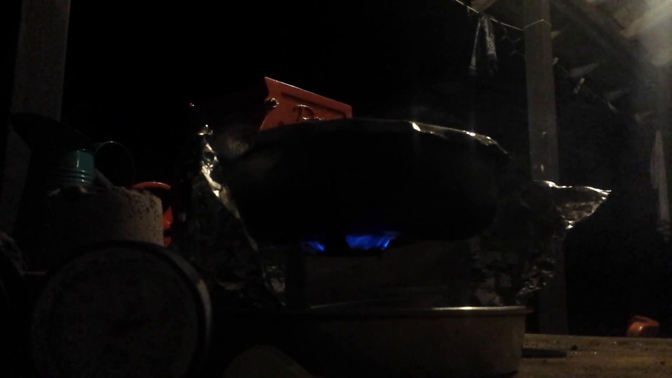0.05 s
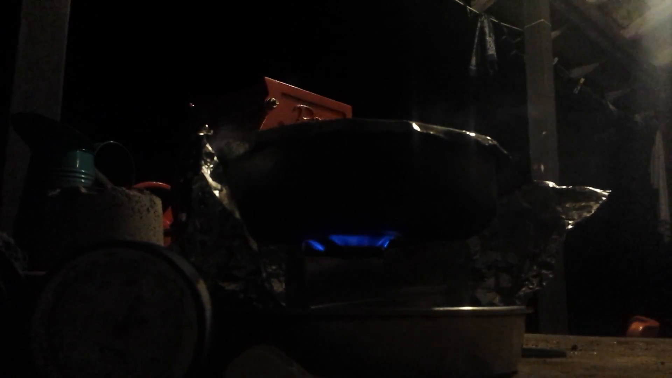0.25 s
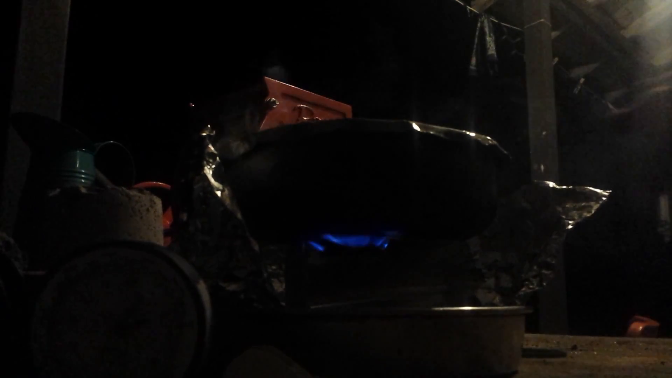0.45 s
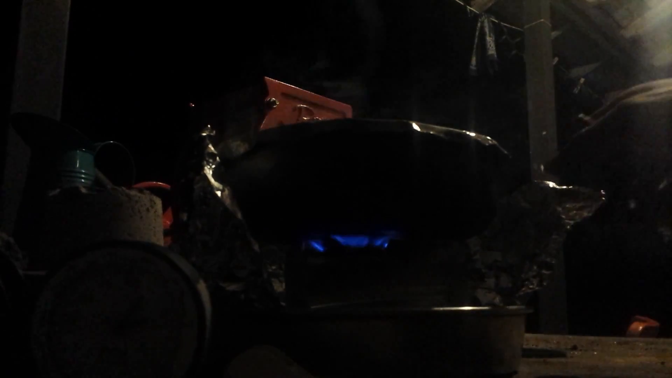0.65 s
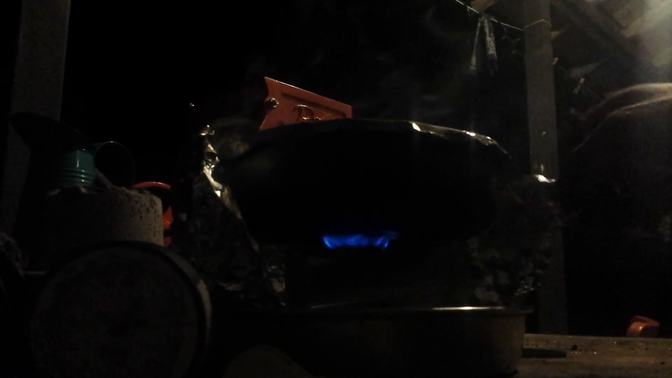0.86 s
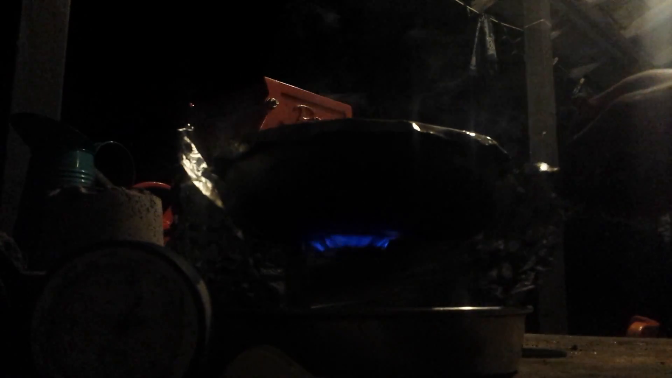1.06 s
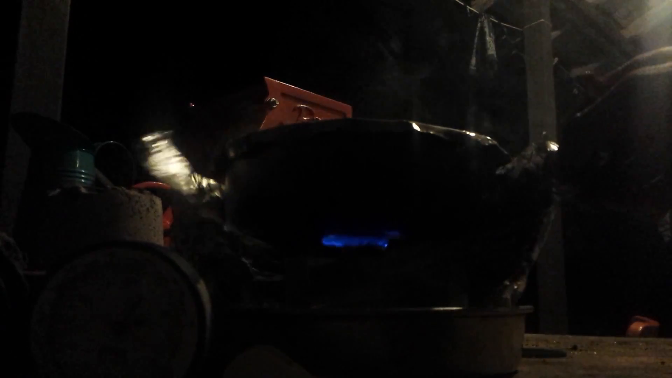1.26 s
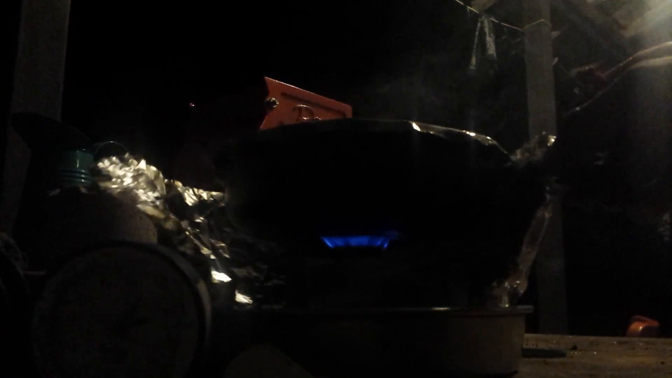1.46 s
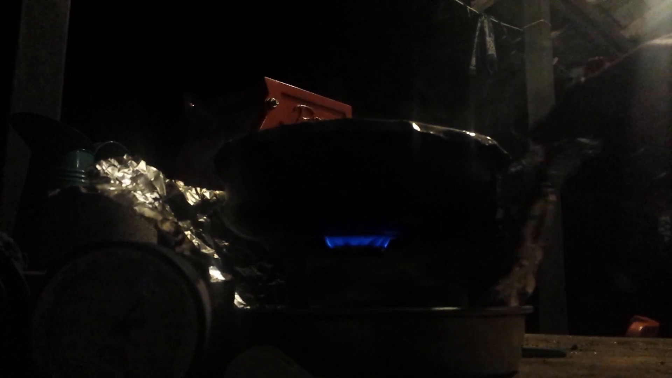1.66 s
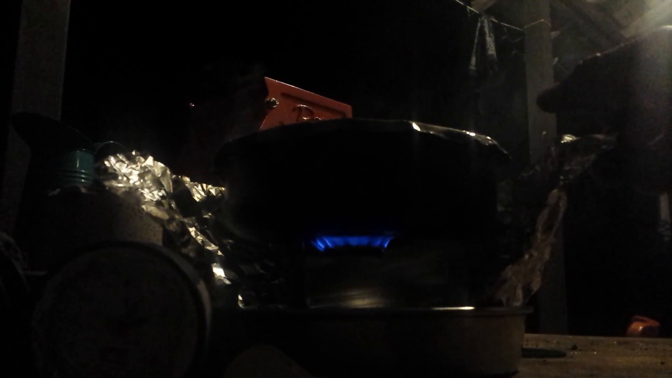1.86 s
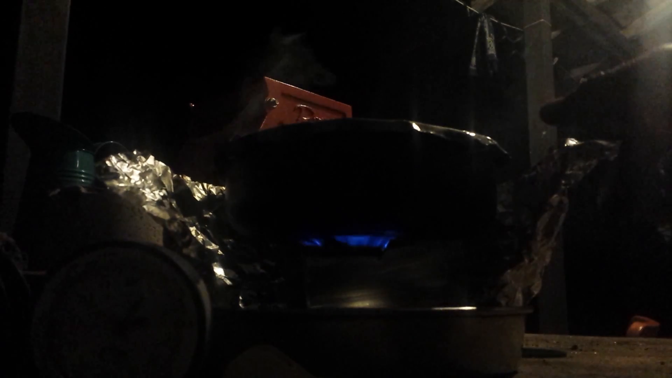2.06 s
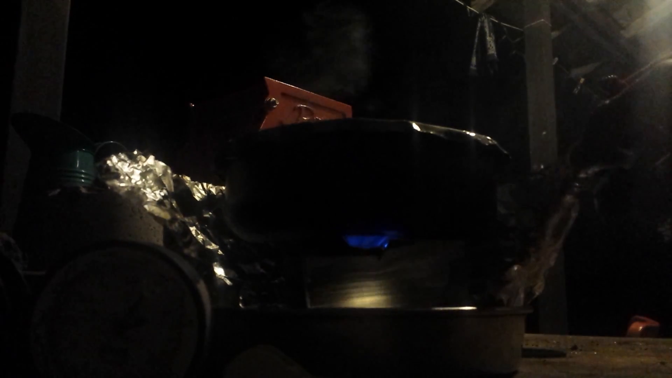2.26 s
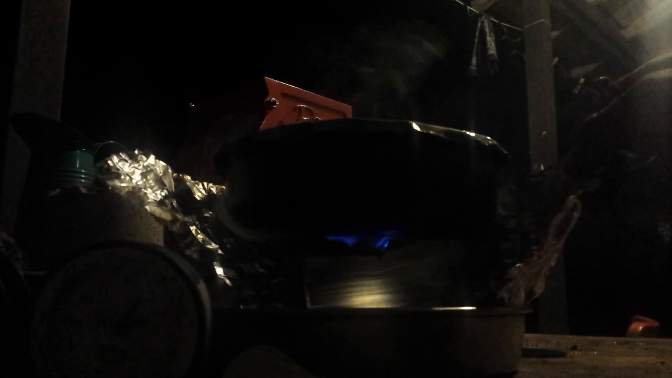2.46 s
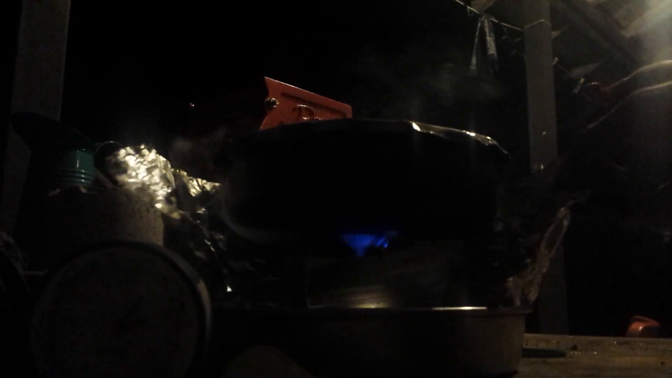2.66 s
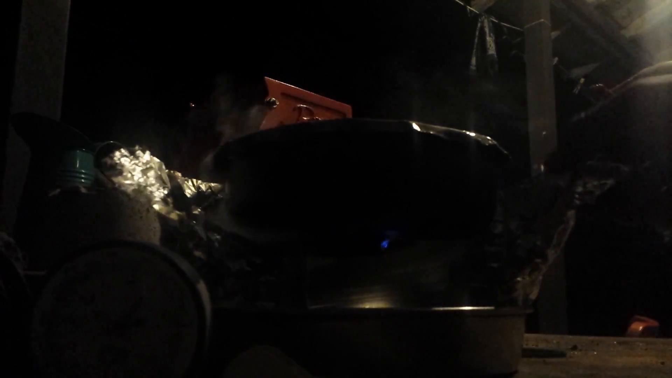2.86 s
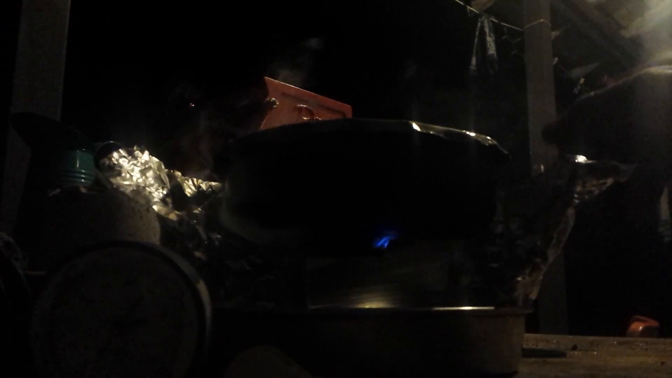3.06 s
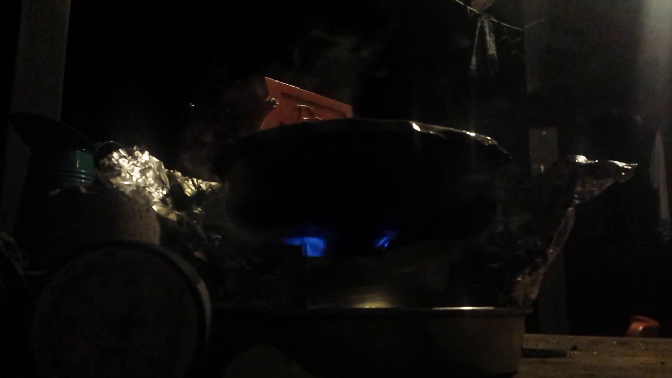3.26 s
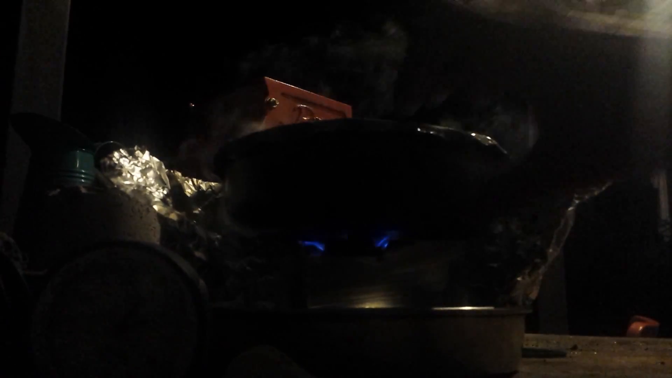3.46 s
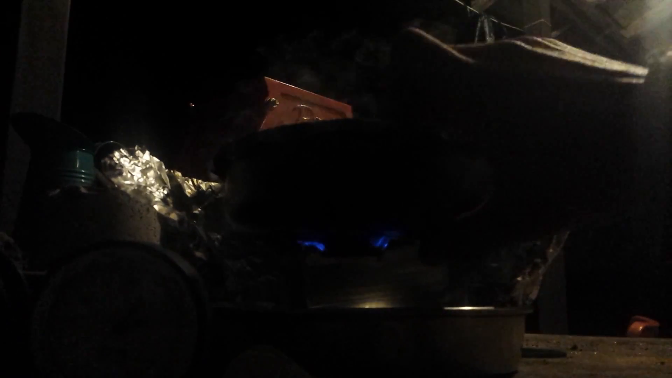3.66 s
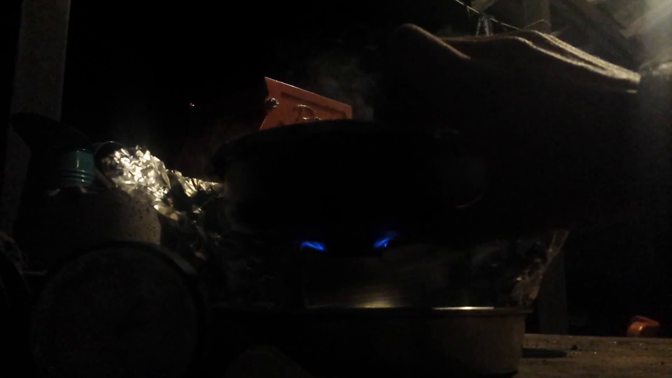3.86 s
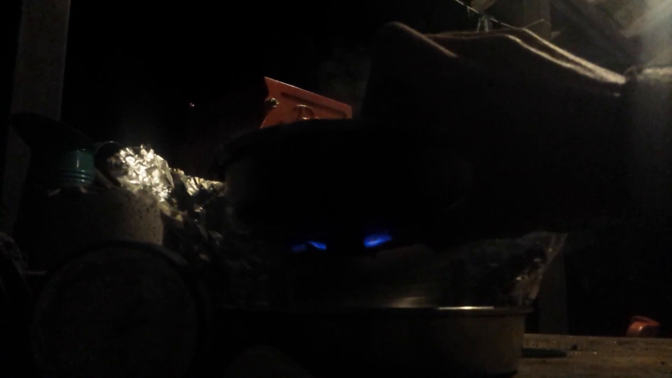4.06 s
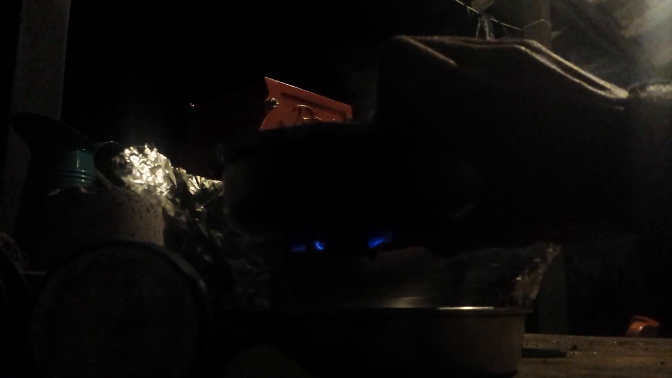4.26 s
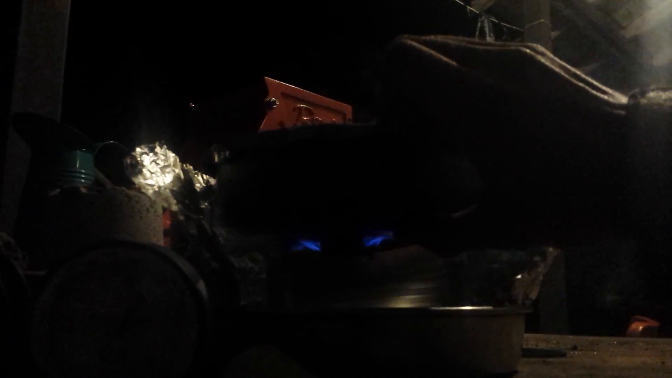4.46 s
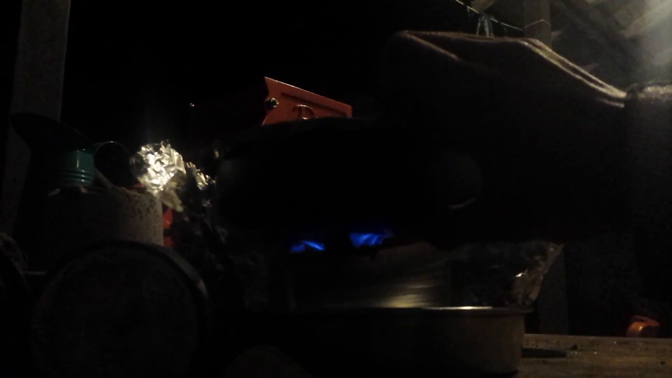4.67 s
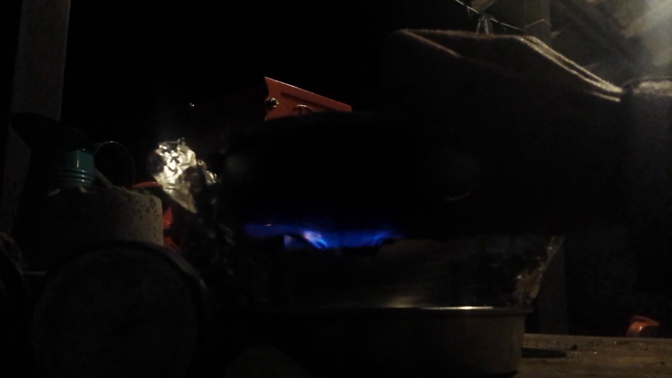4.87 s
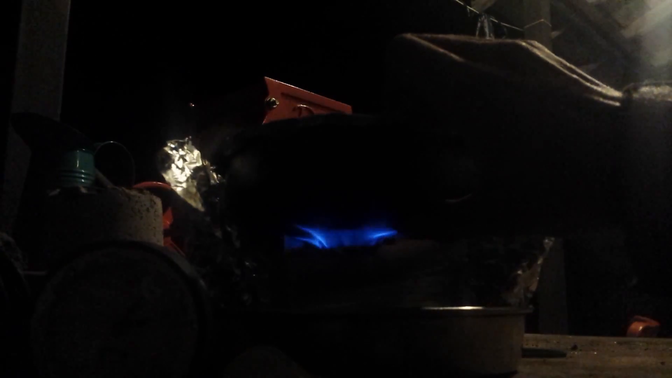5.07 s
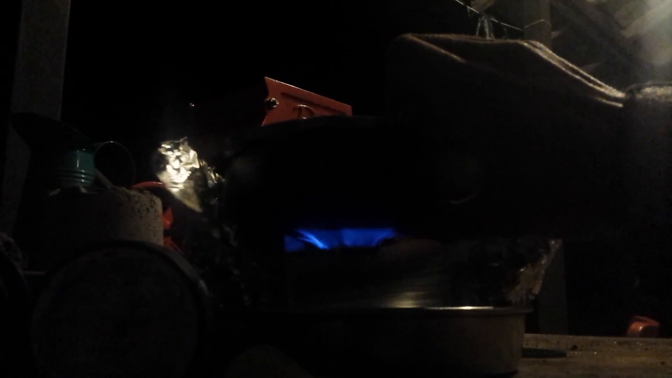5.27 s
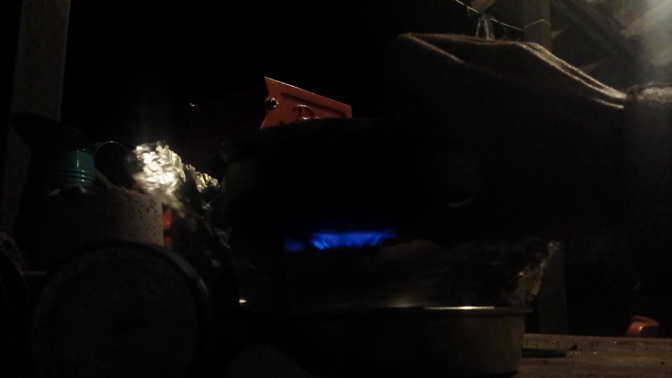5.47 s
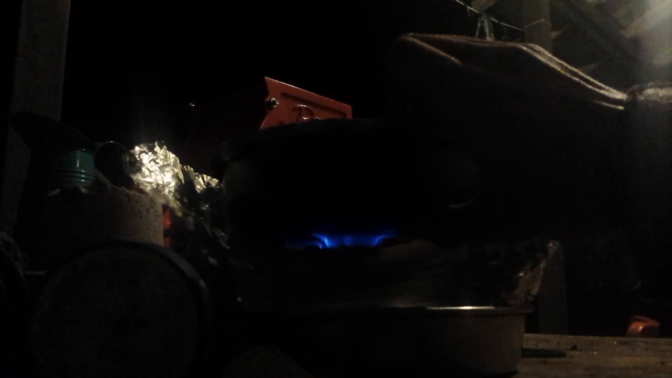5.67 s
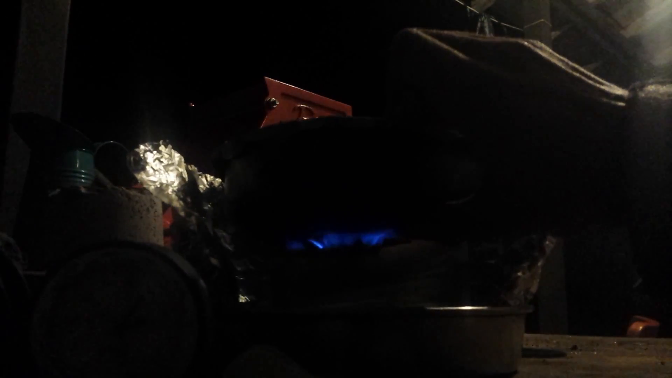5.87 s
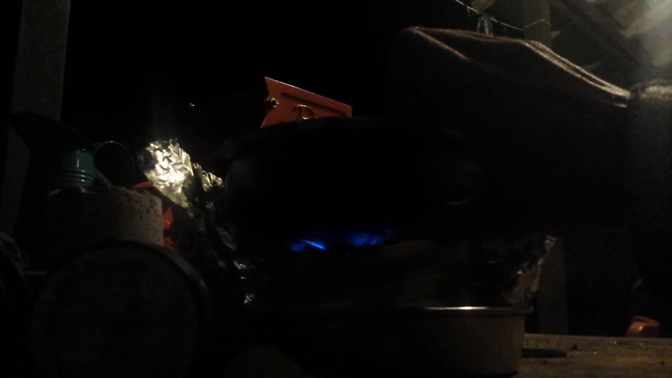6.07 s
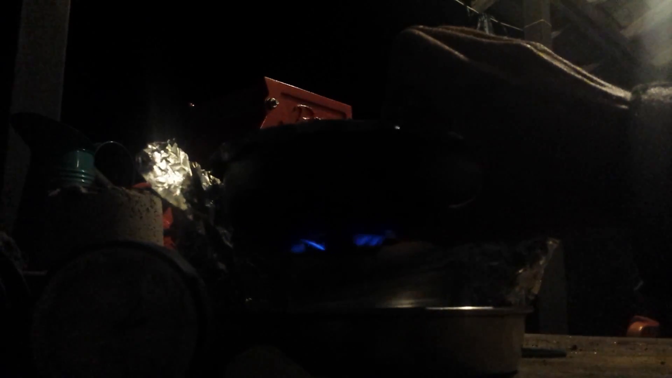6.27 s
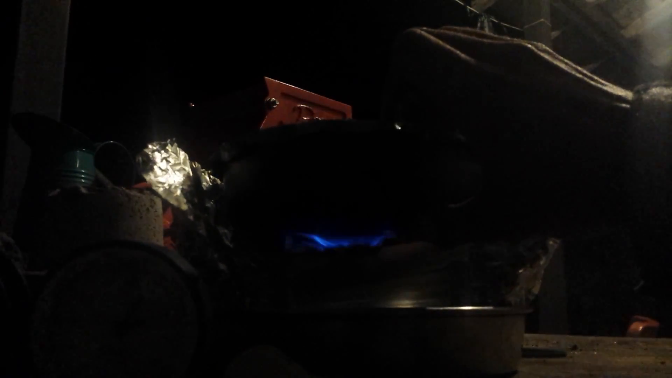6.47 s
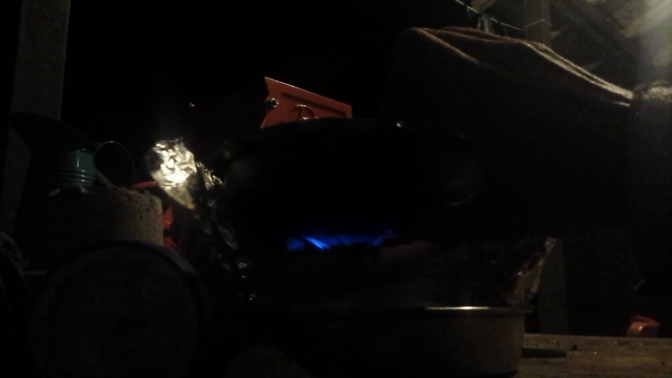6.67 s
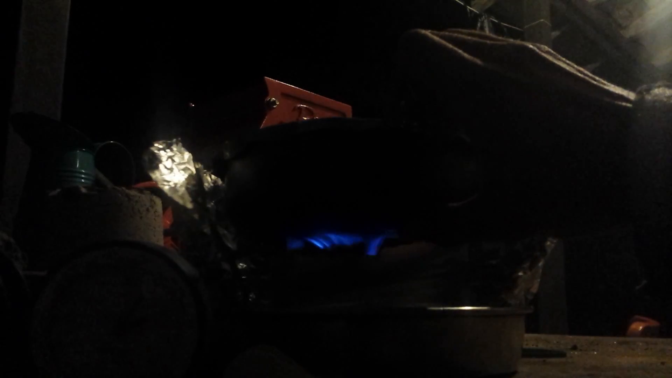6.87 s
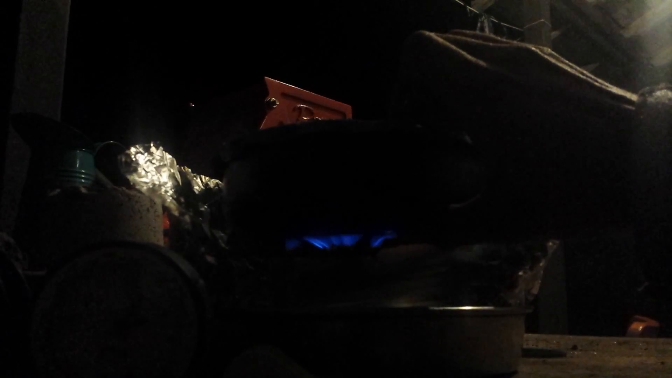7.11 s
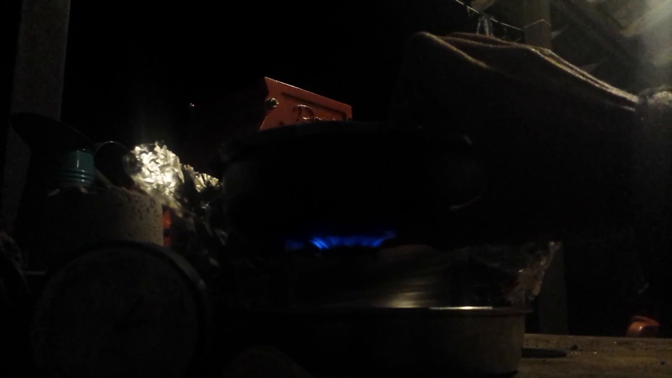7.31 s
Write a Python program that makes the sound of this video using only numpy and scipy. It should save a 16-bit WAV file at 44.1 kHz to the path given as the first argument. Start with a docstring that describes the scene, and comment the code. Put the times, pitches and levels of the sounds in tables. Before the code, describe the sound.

Crumpled aluminium foil crackles and snaps in short bursts around a small gas stove, with dull knocks, a brief pan ring and faint burner rush.

```python
"""At a small camping stove, a crumpled aluminium foil windscreen is bent and pushed around a pan, close by.
Random ticks shaped by the foil's resonances make dense crackle; single folds snap with dying runs of clicks.
Decaying sine modes ring the bumped pan, and filtered noise bursts make the dull knocks of the stove.
Light brushing is dense, filtered ticks; the burner is a faint rush of coloured noise with a fluttering bass.
Nearby surfaces add short reflections."""
import sys
import numpy as np
from scipy import signal
from scipy.fft import rfft, irfft
from scipy.io import wavfile

SR = 44100
rng = np.random.default_rng(int(sys.argv[2]) if len(sys.argv) > 2 else 0)


def log_audio(samples):
    """Write samples as a 16-bit WAV file to the path given in sys.argv[1]."""
    # one column per channel
    frames = np.atleast_2d(samples).T
    # limit to full scale, then quantise
    limited = np.clip(frames, -1, 1)
    pcm = np.round(limited * 32767).astype(np.int16)
    wavfile.write(sys.argv[1], SR, pcm)


N = 323694
TIME = np.arange(N) / SR


def undb(db):
    """Decibels to gain."""
    return 10 ** (np.asarray(db) / 20)


def unit(x):
    """Scale to rms 1."""
    return x / np.sqrt(np.mean(x ** 2) + 1e-20)


def contour(points, f):
    """Read (Hz, value) points on a log-frequency axis."""
    hz, value = np.transpose(points)
    return np.interp(np.log(f + 1), np.log(hz), value)


def colour(x, db_of, size=4096):
    """Causal minimum-phase filter, built by folding the cepstrum; db_of gives its gain at each frequency."""
    f = np.arange(size // 2 + 1) * SR / size
    cepstrum = irfft(np.log(undb(db_of(f)) + 1e-7))
    cepstrum[1:size // 2] *= 2
    cepstrum[size // 2 + 1:] = 0
    response = irfft(np.exp(rfft(cepstrum)))
    return signal.fftconvolve(x, response)[:len(x)]


def butter(x, hz, kind, order=2):
    """Butterworth filter."""
    return signal.sosfilt(signal.butter(order, hz, kind, fs=SR, output="sos"), x)


def through(x, response):
    """Pass both sides through one response."""
    return signal.oaconvolve(x, response[None], axes=1)[:, :x.shape[1]]


def fade(t, t60):
    """Exponential decay, 60 dB down after t60 seconds."""
    return np.exp(-np.log(1000) * t / max(t60, 1e-3))


def walk(rate):
    """Random wander with a spread near 1: straight lines between `rate` random knots a second."""
    knots = rng.standard_normal(4096)
    return np.interp(TIME * rate, np.arange(len(knots)), knots)


def add(track, s, sound):
    """Mix a sound into both sides of a track at s seconds."""
    i = max(int(s * SR), 0)
    track[:, i:i + sound.shape[-1]] += sound[..., :N - i]


def two_sides(draw, apart_hz):
    """Two random signals made into left and right: alike in the bass, unrelated in the treble."""
    mid, side = draw(), draw()
    side = .3 * side + .7 * butter(side, apart_hz, "high", order=1)
    return np.array([mid + side, mid - side]) / np.sqrt(2)


def burner(level_db=-67, flutter_db=1):
    """The low rush of the flame flutters in the draught under an even hiss."""
    # spectrum of the flame noise: pitch_hz [Hz], level_db [relative dB per Hz]
    flame = [(15, -29), (25, -10), (49, -5), (167, -7), (344, -13), (438, -9), (529, -18.5), (709, -13.5),
             (1460, -24.5), (7280, -26), (13800, -29.5), (15000, -39)]

    def noise():
        return colour(rng.standard_normal(N), lambda f: contour(flame, f))

    rush = undb(level_db) * unit(two_sides(noise, 800))
    flutter = undb(flutter_db * walk(39))
    return rush + butter(rush, 600, "low", order=1) * (flutter - 1)


def knocks(rattle=0.078, count=12000):
    """A dry blow and a short, low rattle of the stove on its stand, longer after a harder blow."""
    # dull knocks of the stove: start_s [s], level_db [peak dB before the room and stereo balance],
    # pitch_hz [Hz, scales the thud's band and sets the rattle's cycle]
    blows = [(.061, -51, 500), (0.165, -59, 380), (.451, -43, 345), (.453, -38.5, 1920),
             (0.485, -46.5, 400), (0.558, -46, 378), (0.708, -47, 396), (0.825, -49.5, 400),
             (2.027, -32, 290), (3.034, -40.5, 534), (3.261, -53, 597), (3.345, -40, 256),
             (3.445, -43.5, 330), (3.458, -41, 580), (3.542, -46.5, 250), (3.699, -39.5, 536),
             (3.742, -44.5, 295), (4.532, -29, 433), (4.665, -32, 500), (5.38, -20.5, 460),
             (5.386, -43, 53.6), (5.392, -32, 423), (5.429, -23, 484), (5.64, -33.5, 270),
             (6.043, -39, 194), (6.237, -34.5, 265), (6.284, -45, 203)]
    # a knock at rattle_db decays by 60 dB in rattle_cycles; each doubling_db more doubles the time
    rattle_cycles, rattle_db, doubling_db = 30, -40, 11
    out = np.zeros((2, N))
    for s, db, hz in blows:
        t60 = rattle_cycles / hz * 2 ** ((db - rattle_db) / doubling_db)
        blow = rattle * rng.standard_normal(count) * fade(TIME[:count], t60)
        blow[0] -= 1
        thud = butter(blow, [hz * 0.51, hz * 1.11], "band", order=1)
        thud = butter(thud, hz * 2.8, "low")
        add(out, s, undb(db) * thud / np.abs(thud).max())
    return out


def brushing(brush_db=1, per_s=9000):
    """A light sliding touch before the foil is gripped: fine, dense ticks merge into a hiss."""
    # touches, each a level line through its points: start_s [s], level_db [dB before brush_db]
    touches = [
        [(0.15, -83), (0.38, -66), (0.586, -64.5), (0.776, -74.5), (0.85, -86)],
        [(3.05, -68), (3.24, -77.5), (3.602, -65), (3.636, -72.5), (3.75, -69.5)],
    ]
    ticks = rng.standard_normal((2, N)) * (rng.random((2, N)) < per_s / SR)
    grain = unit(butter(ticks, [1500, 9500], "band", order=1))
    gain = np.zeros(N)
    for touch in touches:
        gain += undb(np.interp(TIME, *np.transpose(touch), left=-120, right=-120))
    return grain * undb(brush_db) * gain


def facet(ring_t60=.004, ring_db=-1, mode_db=8, cycles=50, bounce_t60=.042, bounce_db=2.5, count=2600):
    """One patch of foil flips: a tick, a rasp, a few modes of its own, and its own reflections to each side."""
    t = TIME[:count]
    ring = rng.standard_normal(count) * fade(t, ring_t60)  # the rasp
    ring *= undb(ring_db) / np.linalg.norm(ring)
    ring[0] += 1  # the tick
    for hz in np.geomspace(450, 11000, 5) * 2 ** rng.uniform(-.55, .55, 5):
        decay = fade(t, cycles / hz)  # low modes ring longer
        ring += undb(mode_db) * 2 * np.sin(2 * np.pi * hz * t) * decay / decay.sum()
    # reflections start after 0.4 ms
    paths = two_sides(lambda: rng.standard_normal(count), 1800) * fade(t, bounce_t60) * (t > .0004)
    paths *= undb(bounce_db) / np.linalg.norm(paths[0])
    paths[:, 0] += 1  # direct sound
    tick = signal.fftconvolve(paths, ring[None], axes=1)[:, :count]
    return tick / np.linalg.norm(tick[0])


def sheet(lowest_hz=125, count=4096):
    """How the foil wall radiates a click, as three ranges of equal energy: crackle, sheet body, fine sizzle."""
    # overall spectrum of the foil: pitch_hz [Hz], level_db [relative dB per Hz]
    foil = [(35, -42.5), (60, -5.5), (174, -14), (339, -11.5), (938, 1.5), (1490, -4.5), (2710, 9.5),
            (6530, -11.5), (11600, -17.5), (14000, -9.5), (15000, -17.5)]
    # resonances of the foil wall and the hollow inside it: pitch_hz [Hz], width_hz [Hz], level_db [dB added]
    hollow = [(166.4, 30, 11.5), (221, 110, 12.5), (415, 137, 8), (720, 45, 5.5), (1088, 190, -1.5),
              (1244, 48, 7), (2180, 34, -12), (2437, 1800, -13.5), (3710, 330, -2), (4920, 165, 5),
              (5800, 990, 4), (6950, 1500, 7)]

    def radiation_db(f):
        peaks = sum(db / (1 + (2 * (f - hz) / width) ** 2) for hz, width, db in hollow)
        return contour(foil, f) + peaks

    x = colour(signal.unit_impulse(count), radiation_db)
    body_hz, sizzle_hz = 1650, 8500
    crackle = butter(butter(x, body_hz, "high", order=4), sizzle_hz, "low", order=4)
    body = butter(butter(x, body_hz, "low", order=5), lowest_hz, "high")
    sizzle = butter(x, sizzle_hz, "high", order=5)
    return [r / np.linalg.norm(r) for r in (crackle, body, sizzle)]


def swarm(per_s, spread_db, clump_db, shift_db, count):
    """Patches buckle at random under shared swells of level, while the strain shifts from patch to patch."""
    clump = clump_db * walk(90)
    out = np.zeros((2, N))
    for _ in range(count):
        at = rng.random(N) < per_s / count / SR
        size_db = spread_db * np.minimum(rng.exponential(size=N), 3.5)
        size_db = size_db + clump + shift_db * walk(14)
        flips = np.zeros(N)
        flips[at] = undb(size_db[at]) * rng.choice([-1, 1], N)[at]
        out += signal.oaconvolve(flips[None], facet(), axes=1)[:, :N]
    return unit(out)


def creases(count=640):
    """Larger creases flip at random times, each a dry tick with its own colour."""
    out = np.zeros((2, N))
    for s, size in rng.random((count, 2)):
        tick = facet(mode_db=14, cycles=70, bounce_t60=.032, bounce_db=1)
        add(out, s * N / SR, (.2 + size ** 3) * tick)
    return unit(out)


def push(start, length, ease=.12):
    """Gain of one push: a catch (gentler in a long push), a slow build of strain, then the foil relaxes."""
    shortest_catch_s, strain_db_per_s, relax_db_per_s = .016, 24, 270.5
    past = TIME - start - length
    catch = np.clip((TIME - start) / max(shortest_catch_s, ease * length), 0, 1)
    return catch * undb(np.minimum(strain_db_per_s * past, -relax_db_per_s * past))


def crinkle():
    """Bending drives the swarm and the creases; broad flexing brings out the body, fingertips the sizzle."""
    # pushes that bend the foil: start_s [s], length_s [s], level_db [crackle gain at the end, dB],
    # body_db [sheet body relative to crackle, dB], sizzle_db [fine sizzle relative to crackle, dB]
    pushes = [(0.869, 0.47, -38, -7, -7.5), (1.149, 0.1, -32, -10, -5), (1.236, .19, -31, -5.5, -10.5),
              (1.459, 0.12, -30, -5, -10.5), (1.608, 0.053, -34, -8, -8.5), (1.698, .13, -40.5, -4.5, -7),
              (1.878, 0.072, -50, -2.5, -9), (1.983, 0.035, -45, -4.5, -10), (2.304, 0.068, -45, -3, -7.5),
              (2.416, 0.18, -49, -3.5, -3), (2.574, 0.2, -34, -4, -10.5), (2.819, 0.056, -43.5, -0.5, -7.5),
              (2.911, 0.064, -59.5, -1.5, -7), (3.786, 0.19, -56, 3, -9.5),
              (3.916, 0.041, -42.5, -0.5, -16), (3.997, 0.028, -22.5, -7.5, -20),
              (4.044, 0.09, -38.5, 0.5, -22), (4.222, 0.043, -60, 9.5, -10.5),
              (4.278, 0.084, -45.5, 5.5, -8.5), (4.408, 0.14, -48.5, 0.5, -6),
              (4.512, 0.19, -38.5, -4.5, 0), (4.772, 0.3, -40.5, 2, -12), (5.142, 0.089, -52, 7.5, -7),
              (5.29, .04, -45, -2.5, -8), (5.362, 0.17, -40, -2.5, -10), (5.536, 0.14, -47, -4.5, -4),
              (5.638, 0.13, -52, -2, 10), (5.813, 0.031, -37.5, -1.5, -6.5),
              (5.887, 0.11, -44.5, 2.5, -6.5), (6.029, 0.023, -50, 5.5, -5), (6.11, .15, -57.5, 4, -9),
              (6.272, 0.078, -57, 3.5, -8), (6.581, 0.021, -68.5, 2, -10), (6.666, 0.028, -58.5, 4.5, 0),
              (6.703, .05, -54, 4, -8), (7.137, .014, -47, -9, -3), (7.195, 0.026, -57, -3, -7)]
    fine = swarm(per_s=1500, spread_db=0.5, clump_db=2.0, shift_db=-1.5, count=10)
    single = creases()
    # single ticks stand out most in the treble and merge in the slow body of the sheet
    shares = (.65, .45, .75)
    ranges = [through(unit(fine + share * single), r) for share, r in zip(shares, sheet())]
    power = np.zeros((3, N))
    for start, length, db, body_db, sizzle_db in pushes:
        gains = undb([db, db + body_db, db + sizzle_db])
        power += np.outer(gains, push(start, length)) ** 2
    return sum(sound * np.sqrt(p) for sound, p in zip(ranges, power))


def snaps(snap_db=9, run_db=3, body_db=-15, sizzle_db=-15, follow_per_s=1800, tilt_per_octave=0.44, count=6000):
    """A fold gives way with one crack and sets off a dying run of its neighbours; bright folds trade body for sizzle."""
    # folds that snap through: start_s [s], level_db [dB before snap_db],
    # bright_db [dB, sizzle up and body down], run_s [s, half the 60 dB decay of the clicks]
    folds = [(1.0622, -23.5, 6, .011), (1.1803, -11.5, 3.5, 0.023), (1.193, -12.5, 7, 0.02),
             (1.214, -8.5, -2, 0.02), (1.2937, -13.5, 7, 0.12), (1.516, -13.5, 6, 0.075),
             (1.6326, -14.5, 7, 0.009), (2.2887, -36, -6.5, 0.021), (2.605, -17, 6.5, 0.037),
             (2.6694, -15, 4.5, 0.043), (2.7132, -8.5, -1.5, 0.016), (2.7504, -15, 0.5, 0.021),
             (3.8024, -37.5, -13.5, 0.013), (3.866, -23, -14.5, 0.017), (3.984, -7.5, -2.5, 0.011),
             (4.0132, -10, 0, 0.0053), (4.0234, -10.5, -14, 0.038), (4.2142, -34, 1, 0.0083),
             (4.2726, -12.5, -3, 0.0083), (4.3108, -20.5, -6, 0.057), (4.7014, -35, 14, 0.018),
             (4.771, -18.5, 4.5, 0.039), (5.048, -28, -15, 0.024), (5.1534, -26, -4.5, 0.023),
             (5.305, -36, 6, .02), (5.3817, -15, -1.5, 0.03), (5.457, -20, 0.5, 0.0093),
             (5.491, -28, 7, 0.018), (5.568, -31, 16, 0.0061), (5.7653, -33, 13, 0.0074),
             (5.822, -24.5, 16.5, 0.018), (5.9661, -25.5, -12.5, 0.039), (6.126, -36, 11.5, 0.0059),
             (6.2936, -30.5, -13, 0.013), (6.6264, -53, 17, 0.0044), (6.697, -33, 13, .016),
             (7.0756, -30, -4, 0.027), (7.0936, -15.5, -6.5, 0.013)]
    neighbours = 4  # patches that share the clicks of one snap
    shape = (neighbours, count)
    out = np.zeros((2, N))
    crackle, body, sizzle = sheet(lowest_hz=295)  # a single fold is too small to radiate the lowest notes
    for s, db, bright, length in folds:
        hits = rng.random(shape) < follow_per_s / neighbours / SR
        runs = rng.standard_normal(shape) * hits * fade(TIME[:count], 2 * length)
        runs *= undb(run_db) / (np.linalg.norm(runs) + 1e-9)
        runs[:, 0] += 1 / neighbours ** .75  # all give way at the first crack, partly in step
        clicks = 0
        for run in runs:
            patch = facet(mode_db=-7, cycles=24, bounce_t60=0.047, bounce_db=4)
            clicks = clicks + signal.fftconvolve(run[None], patch, axes=1)
        # tilt the crackle around 3700 Hz
        crack = colour(crackle, lambda f: tilt_per_octave * bright * np.log2(np.clip(f, 1650, 8500) / 3700))
        response = crack + undb(body_db - bright) * body + undb(sizzle_db + bright) * sizzle
        add(out, s, undb(db + snap_db) * through(clicks, response))
    return out


def pan(damping=2.4, count=30000):
    """The pan rings after each bump, damped by the foil pressed against it."""
    # bumps against the pan: start_s [s], level_db [dB]
    bumps = [(4.014, -25), (4.07, -25), (4.273, -59), (5.382, -35), (5.822, -37), (7.094, -47.5)]
    # modes of the pan: pitch_hz [Hz], level_db [dB relative to the bump], t60_s [s, before damping]
    modes = [(754, 0, .6), (969, -11, .45), (1238, -10, .25), (2562, -11, .25), (2832, -11, .25),
             (3741, -12, .2), (4743, -16, .2), (5534, -11, .15)]
    out, t = np.zeros((2, N)), TIME[:count]
    for s, db in bumps:
        buzz = undb(2 * walk(130)[:count])  # loose foil chatters on the rim
        ring = np.zeros(count)
        for hz, mode_db, t60 in modes:
            ring += undb(db + mode_db) * np.sin(2 * np.pi * hz * t) * fade(t, t60 / damping)
        add(out, s, buzz * ring)
    return out


def surroundings(x, tail_db=-12, tail_t60=0.15, count=16000):
    """The shelter around the stove adds a weak, dull tail of decaying noise, starting after 5 ms."""
    t = TIME[:count]
    tail = two_sides(lambda: rng.standard_normal(count), 580)
    tail = butter(tail, 6200, "low", order=1) * fade(t, tail_t60) * (t > .005)
    return x + undb(tail_db) * signal.oaconvolve(x, tail / np.linalg.norm(tail[0]), axes=1)[:, :N]


def scene():
    """The foil stands a little to the right: the left side gets it later and with less treble."""
    # stereo balance: pitch_hz [Hz], level_db [left minus right, dB]
    balance = [(100, 1.5), (450, 2), (1050, -1.5), (2000, 2), (3200, 2), (4900, .5), (6500, -6),
               (9000, -8.5), (14500, -8)]
    left_lag = 4  # samples
    left, right = surroundings(knocks() + brushing() + crinkle() + snaps() + pan())
    left = np.pad(left, (left_lag, 0))[:N]
    left = colour(left, lambda f: contour(balance, f) / 2)
    right = colour(right, lambda f: -contour(balance, f) / 2)
    return np.array([left, right]) + burner()


def record(dry):
    """A steep elliptic low-pass cuts the top above 14650 Hz."""
    return signal.sosfilt(signal.ellip(10, .2, 70, 14650, fs=SR, output="sos"), dry)


dry = scene()
out = record(dry)
log_audio(out)
```